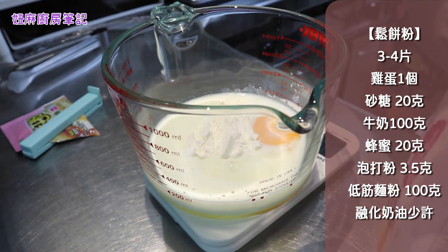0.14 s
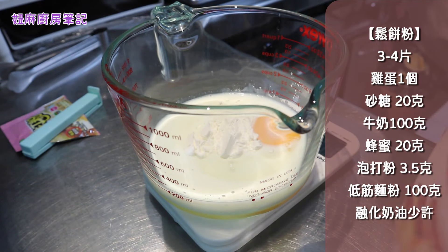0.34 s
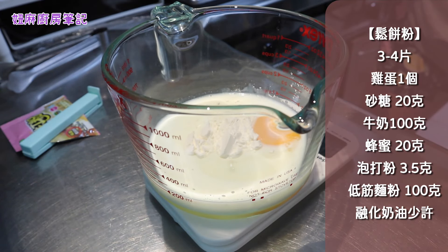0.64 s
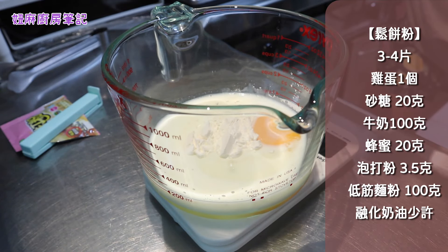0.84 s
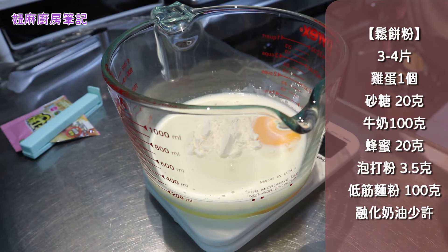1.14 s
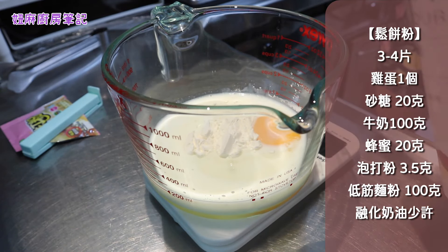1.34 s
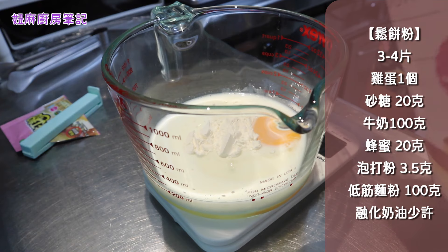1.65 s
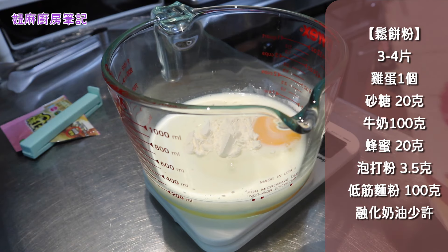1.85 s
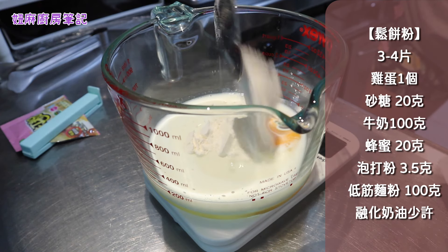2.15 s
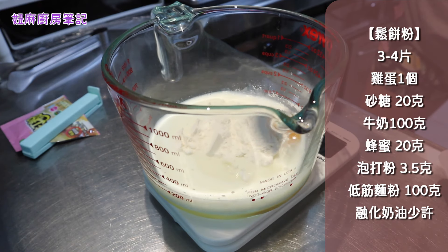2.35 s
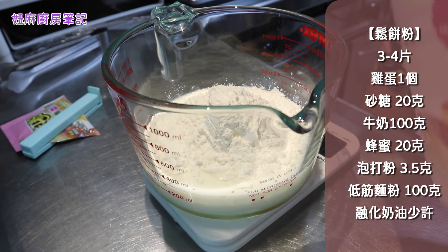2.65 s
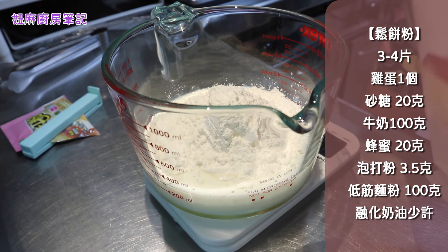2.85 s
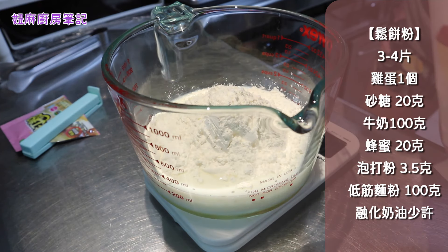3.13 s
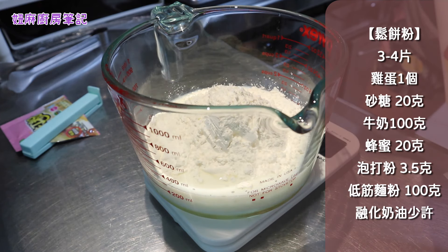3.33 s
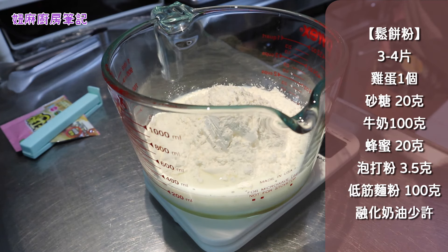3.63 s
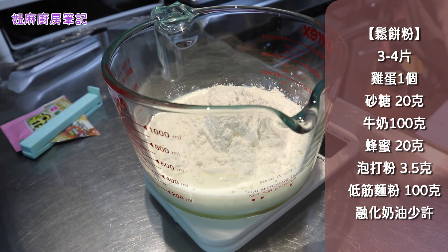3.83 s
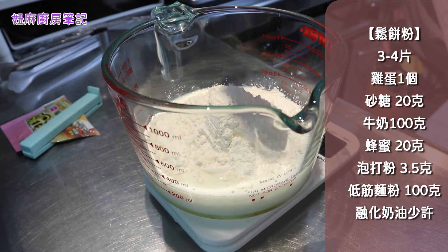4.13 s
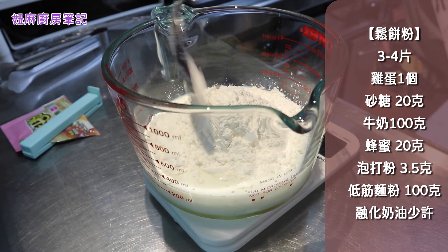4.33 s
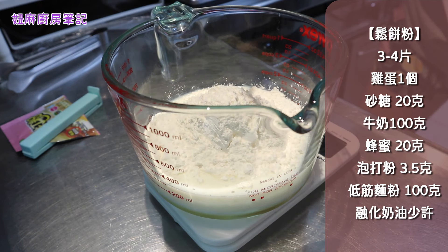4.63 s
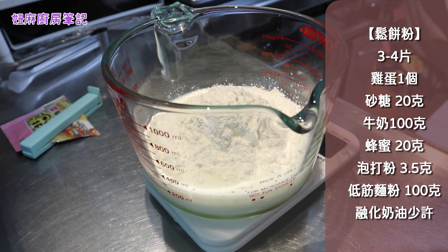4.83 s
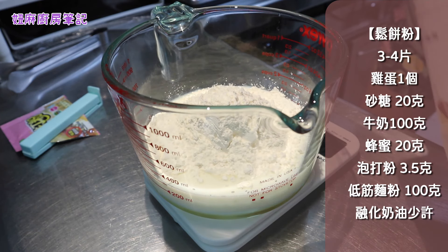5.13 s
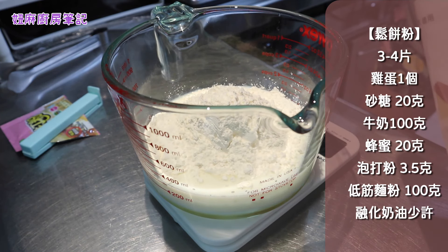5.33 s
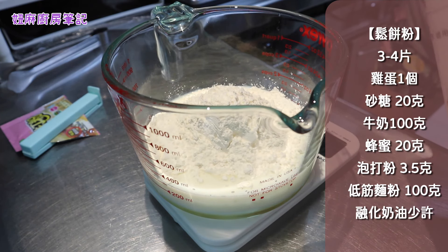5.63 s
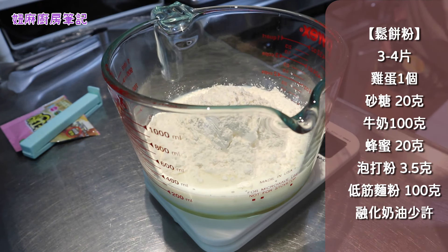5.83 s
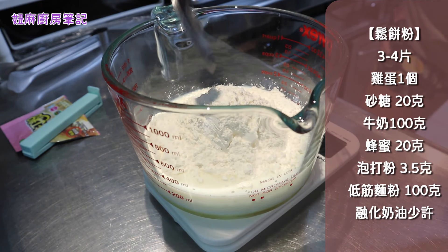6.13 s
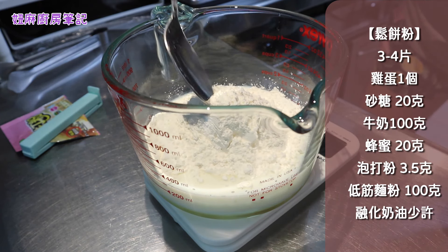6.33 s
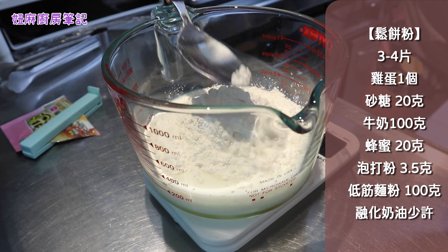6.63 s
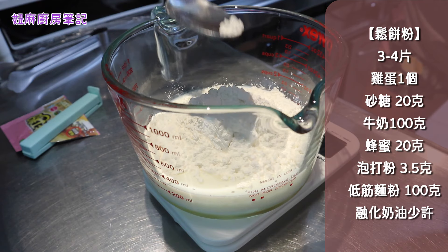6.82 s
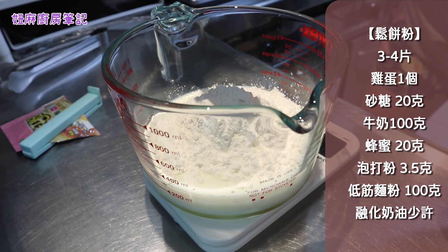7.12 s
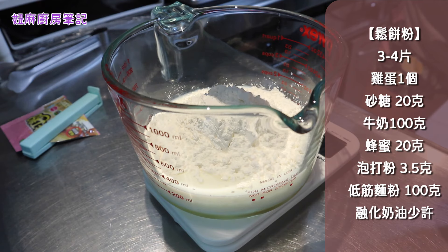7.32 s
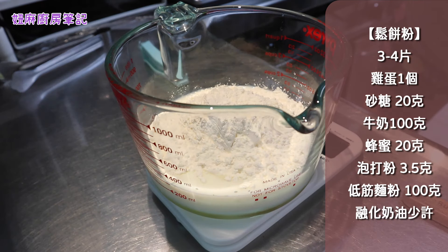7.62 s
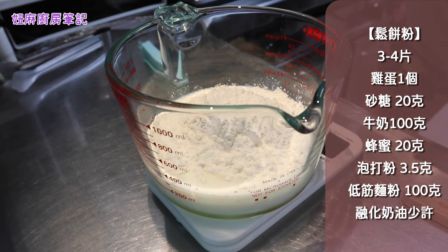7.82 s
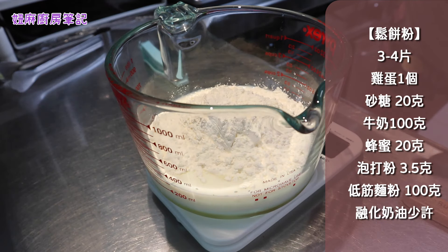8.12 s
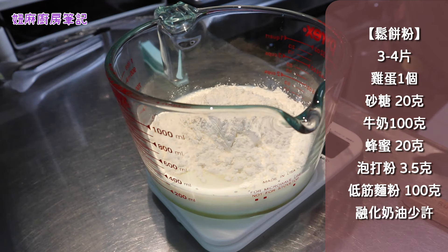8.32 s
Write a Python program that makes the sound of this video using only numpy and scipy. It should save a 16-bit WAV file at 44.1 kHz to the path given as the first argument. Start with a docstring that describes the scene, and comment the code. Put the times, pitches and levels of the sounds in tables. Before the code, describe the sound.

In a small kitchen, a phone on the counter picks up a low, wavering fan and fridge hum with a rush of air. A bag rustles first. After a lull the hum jumps in level, and soft scoop knocks mix with brief hisses of flour sliding into a jug. Scattered taps and another little slide come next, then crisp bursts of bag crinkling finish.

```python
"""A kitchen, heard by a phone on the counter. A fan and a fridge hum in the room's low modes, with a
wavering drone and a rush of air; their level drifts up and jumps once. Flour slides and hisses, a
scoop knocks softly and a bag crinkles, each blow exciting resonances of the object and the counter.
The two microphone ports agree in the bass and oppose each other in the treble."""
import sys
import numpy as np
from scipy import signal
from scipy.fft import rfft, irfft, next_fast_len
from scipy.io import wavfile
from scipy.ndimage import map_coordinates

SR = 44100
rng = np.random.default_rng(int(sys.argv[2]) if len(sys.argv) > 2 else 0)


def bounce(signal):
    """Save signal as a 16-bit WAV file at the path given by the first command-line argument."""
    frames = np.transpose(np.atleast_2d(signal))
    limited = np.clip(frames, -1, 1)
    pcm = np.round(limited * 32767).astype(np.int16)
    wavfile.write(sys.argv[1], SR, pcm)


N = 373527
TOP_HZ = 16258

# All levels are relative. Background before and after its jump. Each row: time in seconds, then
BACKGROUND_LEVELS = [
    [(0.0, -43, -45), (0.12, -43, -36), (0.24, -51, -44.5), (0.28, -39, -39.5), (0.41, -45, -42),
     (0.47, -46, -47.5), (0.6, -50.5, -47.5), (0.88, -47.5, -49), (1.28, -41, -47.5), (1.6, -40.5, -43.5),
     (1.76, -39, -43.5), (2.18, -40, -42), (2.62, -37.5, -43)],
    [(2.63, -33.5, -25), (2.68, -23, -28.5), (2.81, -22, -25), (2.86, -23, -27), (2.97, -24.5, -28),
     (3.05, -20, -28.5), (3.16, -26.5, -26.5), (3.25, -30.5, -36), (3.46, -29.5, -32.5), (3.73, -31.5, -32),
     (4.22, -28.5, -34), (4.89, -29.5, -31.5), (5.05, -24.5, -37), (5.38, -28, -29), (6.26, -27, -31),
     (6.74, -31.5, -31), (7.01, -28.5, -31.5), (7.33, -31, -30.5), (7.44, -28.5, -37), (7.74, -39, -39),
     (8.0, -32, -35), (8.21, -30.5, -33.5), (8.47, -28, -32.5)],
]  # hum and air rush in dB
DRONE_PATH = [
    [(0.0, 64.0, -72), (0.09, 59.9, -46), (0.35, 55.4, -54), (0.48, 43.7, -57), (0.73, 43.3, -57),
     (0.88, 56.0, -44), (1.03, 55.8, -54), (1.15, 44.7, -46), (1.28, 45.4, -51), (1.48, 55.6, -49),
     (1.66, 55.4, -47), (1.81, 43.2, -44), (2.13, 43.8, -39), (2.24, 50.4, -58), (2.36, 45.6, -40),
     (2.5, 46, -47.5), (2.62, 48, -30.5)],
    [(2.63, 59.45, -23), (2.71, 59.6, -27.5), (2.86, 57.2, -27), (2.97, 51.8, -30.5), (3.02, 52, -27.5),
     (3.3, 51.93, -39), (3.38, 50.35, -33.5), (3.62, 50.2, -31.5), (3.73, 56.2, -34), (3.85, 50.4, -33),
     (3.9, 50.4, -32.5), (4.78, 50.33, -26.5), (5.17, 50.6, -28), (5.36, 49.55, -28), (5.44, 52.1, -26.5),
     (5.56, 52.1, -27.5), (5.87, 49.5, -33.5), (5.95, 54.4, -27), (6.01, 55.4, -30.5), (6.21, 52.9, -30.5),
     (6.32, 57.3, -36), (6.37, 57.1, -29.5), (6.89, 56.85, -29), (6.96, 55.4, -27), (7.05, 45.7, -31),
     (7.12, 44.9, -31), (7.2, 45.3, -41), (7.31, 53.2, -29), (7.41, 53.3, -35), (7.53, 44.6, -32),
     (7.59, 44, -46), (8.09, 43.7, -34), (8.47, 43.7, -36.5)],
]  # pitch in Hz, level in dB
# Slides of flour with bag rustle. Each row: time in seconds, hiss in dB, body in dB re hiss.
FLOUR_SLIDES = [
    [(0.0, -78, 7.5), (0.088, -42, 11), (0.13, -67, 8), (0.18, -50.5, 9), (0.308, -79, 6),
     (0.318, -39, 3.5), (0.334, -32, 7.5), (0.368, -54, 8), (0.38, -35, 7.5), (0.398, -54.5, 14.5),
     (0.5, -76, 10)],
    [(1.35, -77, 4), (1.392, -73, 9), (1.4, -67.5, 6), (1.488, -57.5, 5), (1.556, -68, 7), (1.624, -61, 9),
     (1.642, -82, 6), (1.7, -73, 6)],
    [(2.62, -62, 9), (2.624, -46, 11.5), (2.74, -45.5, 2), (2.82, -34, 4), (2.882, -52.5, 7),
     (2.894, -38.5, 4), (2.954, -57, 4), (3.056, -56, 7), (3.066, -35.5, 3), (3.172, -48, 7),
     (3.182, -37, 11.5), (3.192, -44, 8.5), (3.3, -62.5, 9.5)],
    [(3.3, -59, 6), (3.32, -66, 4), (3.334, -41.5, 6), (3.344, -52.5, 6), (3.412, -45, 6),
     (3.422, -58, 8.5), (3.668, -56.5, 6.5), (3.758, -49.5, 5.5), (3.822, -65, 4), (3.876, -39.5, 5),
     (3.926, -53.5, 7), (3.984, -47, 13), (3.996, -43.5, 1), (4.062, -62, 5), (4.1, -70, 6)],
    [(5.6, -67, 3), (5.65, -56, 5), (5.658, -38, 10), (5.7, -60.5, 9), (5.718, -41.5, 6.5), (5.804, -61, 8),
     (5.85, -57, -2)],
    [(6.1, -57.5, 9), (6.18, -56.5, 3), (6.186, -47, 12), (6.214, -67, 10), (6.3, -63, 10)],
    [(7.3, -61, 3), (7.386, -53.5, 17), (7.398, -31.5, 1), (7.428, -47.5, 8), (7.444, -27.5, 3.5),
     (7.494, -47, 6), (7.528, -27, 1), (7.606, -48.5, 8), (7.61, -32, 4.5), (7.644, -55.5, 7),
     (7.776, -49, 17), (7.9, -66, 10)],
    [(8.05, -70, 6), (8.078, -64, 9), (8.086, -33.5, 8), (8.138, -65, 6), (8.172, -41, 8),
     (8.216, -66.5, 6), (8.388, -80, 3), (8.398, -31.5, 5), (8.47, -54, 6)],
]
# Noise spectra. Each row: frequency in Hz, spectral density in dB.
AIR_SPECTRUM = [(15, -34), (25, 1), (53, 2), (145, -15), (170, -6.5), (256, -11.5), (384, -20), (659, -17),
                (1610, -25.5), (2610, -33), (5000, -52.5), (6740, -52.5), (11300, -80.5), (16000, -103)]
HISS_SPECTRUM = [(1470, -19.5), (2500, -0.5), (2940, -7.5), (3310, -17), (4140, -19), (6760, -11),
                 (14500, -45.5), (16000, -33)]
BODY_SPECTRUM = [(180, 2), (300, -5), (429, -18), (468, -18), (516, -4), (1180, -8), (4000, -23),
                 (5200, -24), (8800, -120)]
# Resonances. Each row: centre in Hz, nominal width in Hz, level in dB.
ROOM_MODES = [(86.8, 5, -2.5), (117.46, 6.4, -3.5), (174.84, 6.15, -2.5), (212, 9.1, -6.5), (258.1, 11, -9),
              (516.3, 8, -16)]
MOTOR_WHINE = [(3350, 26, 4.5), (6760, 80, -1.5)]
BAG_MODES = [(1140, 110, -1.5), (1944, 526, 2), (2590, 664, -4)]
SCOOP_MODES = [(1065, 205, 3), (1840, 555, 2.5), (2570, 640, -6.5)]
COUNTER_MODES = [(626, 222, -1.5), (363, 259, -3)]
CRACK_MODES = [(5000, 1840, 7), (9000, 5000, -32)]
# Impacts. Each row: start in seconds, level in dB, thump and crack in dB re that level,
# 60 dB decay time in seconds, ring frequency in Hz.
SCOOP_KNOCKS = [(0.4943, -32, 1.5, -38, 0.039, 1900), (0.6727, -28, -1, -28, 0.037, 1300),
                (0.816, -43, -1, -25, 0.038, 1100), (0.843, -33, -6, -35, 0.038, 1200),
                (2.214, -38, 17, -37, 0.051, 1000), (2.6768, -17.5, 5.5, -23, 0.053, 1720),
                (2.7598, -22, -6, -23, 0.026, 1170), (2.8489, -10.5, 5.5, -35, 0.029, 1710),
                (2.8893, -21, -5, -10, 0.079, 1040), (3.0055, -34, 0, -29, 0.035, 1190),
                (3.0673, -24.5, -12, -5, 0.067, 1780), (3.0894, -8.5, -5.5, -33, 0.046, 1800),
                (3.1796, -9, -1.5, -22, 0.043, 1390), (3.3335, -25, -8, -8, 0.035, 1670),
                (3.404, -23, 7.5, -29, 0.039, 1870), (3.704, -25, -12, -37, 0.038, 1210),
                (3.8868, -22.5, -12, -20, 0.035, 1830), (3.9932, -24, -14, -14.5, 0.045, 1990),
                (5.1372, -19, 9, -24, 0.041, 1880), (5.2593, -11.5, -0.5, -31, 0.037, 1085),
                (5.6596, -13, 2, -26, 0.035, 2100), (5.7143, -20.5, -8, -17, 0.035, 1530),
                (5.8603, -33, -10.5, -24, 0.035, 1140), (6.1885, -26.5, -14, -25, 0.026, 1177)]
BAG_SNAPS = [(0.0348, -21, -0.5, -34, 0.022, 2060), (0.062, -15, -1.5, -22, 0.035, 1380),
             (0.0805, -13.5, -3, -13, 0.025, 1730), (0.0984, -18.5, -5, -24.5, 0.017, 1750),
             (0.1194, -35, 13, -29, 0.019, 1090), (0.1475, -36.5, 15.5, -23, 0.034, 1810),
             (0.1623, -21.5, -22, -21, 0.032, 1320), (0.174, -19, -9, -18, 0.028, 1710),
             (0.212, -18, -5, -31, 0.03, 3070), (0.2731, -16, -16, -20, 0.027, 1930),
             (0.2988, -29, 11, -21, 0.011, 1220), (0.3212, -11, -6, -15, 0.031, 1730),
             (0.3373, -15, 0.5, -1, 0.025, 1120), (0.38, -11, -6, -15, 0.027, 1760),
             (0.4139, -18, -4.5, -36, 0.023, 1870), (7.3682, -21, 5, -11, 0.028, 1500),
             (7.3979, -9, -10, -7, 0.032, 2210), (7.4346, -11.5, -11, -19, 0.033, 2150),
             (7.4452, -5, -16, -8, 0.019, 2010), (7.4699, -18, -14, -0.5, 0.023, 2140),
             (7.5085, -13.5, -5, -8, 0.036, 1670), (7.5252, -6.5, -9.5, -9, 0.028, 2500),
             (7.5531, -9.5, -8, -5, 0.023, 2350), (7.6117, -6.5, -22, -10, 0.023, 2020),
             (7.6829, -19.5, -16, -9, 0.025, 1850), (7.7649, -7.5, -17, -9, 0.021, 1910),
             (7.867, -24.5, -12, -31, 0.031, 1660), (8.087, -12.5, -11, -5, 0.014, 2320),
             (8.1652, -12, -13.5, -21, 0.028, 1640), (8.1734, -14, -11, -13, 0.052, 1980),
             (8.3961, -11, -13, -22, 0.031, 2390), (8.4006, -1.5, -24, -23, 0.026, 1810),
             (8.4066, -13, -26, -7, 0.028, 1780), (8.4465, -16.5, -5, -28, 0.023, 1010)]
# Reverberation. Each row: frequency in Hz, 60 dB decay time in seconds.
KITCHEN_T60 = [(300, 0.15), (2000, 0.21), (10000, 0.17)]
# Port difference re sum. Each row: frequency in Hz, level in dB, phase lead in radians, coherence.
PORT_DIFFERENCE = [(60.0, -23, 2.5, 0.8), (110.0, -15.5, 1.94, 0.85), (220.0, -9, 1.61, 0.76),
                   (390.0, -4.5, 1.42, 0.83), (630.0, -6, 1.54, 0.95), (980.0, -4.5, 1.65, 0.83),
                   (1430.0, -3.5, 1.93, 0.9), (1930.0, -2.5, 2.55, 0.65), (2440.0, -2.5, 3.5, 0.63),
                   (2980.0, 1.5, 3.28, 0.47), (3720.0, 5, 3.8, 0.52), (4810.0, 4, 3.1, 0.4),
                   (6420.0, 4, 3.62, 0.44), (8660.0, 10.5, 4.3, 0.5), (12250.0, 11.5, 3.08, 0.15)]


def amp(db):
    """Amplitude ratio of a level in dB."""
    return 10 ** (np.asarray(db) / 20)


def unit(x):
    """Normalisation to rms 1."""
    return x / np.sqrt(np.mean(x ** 2) + 1e-20)


def along(table, hz, column=1):
    """Interpolation of a column over log frequency."""
    columns = np.transpose(table)
    return np.interp(np.log(hz + 1), np.log(columns[0] + 1), columns[column])


def curves(rows):
    """Interpolation of each column over time, sample by sample."""
    times, *columns = np.transpose(rows)
    return [np.interp(np.arange(N) / SR, times, c) for c in columns]


def wobble(rate):
    """Smooth random modulation, rate knots a second."""
    return map_coordinates(rng.standard_normal(int(N * rate / SR) + 4), [np.arange(N) * rate / SR])


def filtered(x, response):
    """Linear filtering: the spectrum times a frequency response."""
    size = next_fast_len(x.shape[-1] + min(x.shape[-1] // 8, 8192))
    return irfft(rfft(x, size) * response(np.fft.rfftfreq(size, 1 / SR)), size)[..., :x.shape[-1]]


def modes(table):
    """Superposition of damped resonators, alternating in sign."""
    return lambda f: sum((-1) ** k * amp(db) * 1j * f * width / (hz * hz - f * f + 1j * f * width)
                         for k, (hz, width, db) in enumerate(table))


def noise(response):
    """Two incoherent noises of one spectrum: the direct path and the scattered one."""
    return unit(filtered(rng.standard_normal((2, N)), response))


def resonant_noise(table):
    """Random excitation of resonances gives narrow bands of noise."""
    return noise(lambda f: sum(amp(db) / np.sqrt(width) * np.abs(modes([(hz, width, 0)])(f)) ** 1.435
                               for hz, width, db in table))


def drone():
    """A deep tone wavers by frequency and amplitude modulation, over a rumble."""
    hz, db = curves(sum(DRONE_PATH, []))
    phase = 2 * np.pi * np.cumsum(hz + 3 * wobble(9)) / SR
    tone = np.sqrt(2) * np.sin(phase) * amp(2.5 * wobble(7.2))
    rumble = resonant_noise([(49.6, 25, 6), (28, 20, -10.5)])
    return amp(db - 0.5) * (tone + .7 * rumble)


def fan_and_fridge():
    """Forced room modes hum under a broadband rush of air and a motor whine."""
    hum_db, air_db = curves(sum(BACKGROUND_LEVELS, []))
    hum = amp(hum_db - 1) * resonant_noise(ROOM_MODES)
    air = noise(lambda f: amp(along(AIR_SPECTRUM, f)) * f ** 2 / (f ** 2 + 200 ** 2))
    whine = amp(-34.5) * resonant_noise(MOTOR_WHINE)
    return hum + amp(air_db + 1 + 0.68 * wobble(7)) * (air + whine)


def sliding_flour():
    """Granular flow: uneven grains, in clumps, sum to a hiss and a duller body."""
    out, t = np.zeros((2, N)), np.arange(N) / SR
    grains = rng.standard_normal((2, N)) * amp(1.66 * wobble(40) + 3.2 * wobble(400))
    hiss = unit(filtered(grains, lambda f: amp(along(HISS_SPECTRUM, f))))
    body = unit(filtered(grains, lambda f: amp(along(BODY_SPECTRUM, f))))
    for rows in FLOUR_SLIDES:
        hiss_db, body_db = curves(rows)
        gate = np.clip(np.minimum(t - rows[0][0], rows[-1][0] - t) / .005, 0, 1)
        out += gate * amp(hiss_db + 1) * (hiss + amp(body_db) * body)
    return out


def impacts(events, object_modes, gain_db):
    """Impact excitation: dying noise bursts drive the object, the counter and a treble crack."""
    out, t = np.zeros((2, N + SR)), np.arange(SR // 10) / SR
    attack = (1 - np.exp(-t / .00037)) * (1 + 1.1 * np.exp(-t / .0007))
    for start, db, thump_db, crack_db, t60, ring_hz in events:
        at = round(start * SR)
        struck_modes = object_modes + [(ring_hz, 700, 3)]  # each spot favours its own pitch
        parts = [(struck_modes, 0, t60), (COUNTER_MODES, thump_db, 1.3 * t60),
                 (CRACK_MODES, crack_db, .8 * t60)]
        for resonances, part_db, part_t60 in parts:
            decay = amp(-60 * t / part_t60)
            burst = rng.standard_normal((2, len(t))) * attack * decay
            ring = filtered(burst, lambda f: modes(resonances)(f) / (1 + 1j * f / 9000) ** 2)
            ring *= np.linalg.norm(decay) / np.linalg.norm(ring[0])  # same energy as the envelope
            out[:, at:at + len(t)] += amp(db + part_db + gain_db) * ring
    return out[:, :N]


def reverberation(x, level_db):
    """Diffuse decay, each frequency at its own rate; a new tail every quarter second."""
    out, step, delay = np.zeros((2, N + 2 * SR)), SR // 4, 300
    for start in range(0, N, step):
        hz, t, spectra = signal.stft(rng.standard_normal((2, SR // 2)), SR, nperseg=256)
        decay = amp(-60 * t / along(KITCHEN_T60, hz)[:, None])
        tail = signal.istft(spectra * decay, SR, nperseg=256)[1]
        wet = signal.fftconvolve(x[:, start:start + step], tail / np.linalg.norm(tail[0]), axes=1)
        out[:, start + delay:start + delay + wet.shape[1]] += wet
    return amp(level_db) * out[:, :N]


def microphone_ports(paths):
    """Partial coherence: the sum is direct sound; the difference is part phase-shifted, part scattered."""
    direct, scattered = paths
    gain = lambda f: amp(along(PORT_DIFFERENCE, f))
    lead = lambda f: along(PORT_DIFFERENCE, f, column=2)
    coherence = lambda f: along(PORT_DIFFERENCE, f, column=3)
    side = filtered(direct, lambda f: gain(f) * coherence(f) * np.exp(1j * lead(f)))
    side += filtered(scattered, lambda f: gain(f) * np.sqrt(1 - coherence(f) ** 2))
    return np.array([direct + side, direct - side])


def scene():
    """Superposition of all sources at the ports; only the impacts reverberate."""
    background = drone() + fan_and_fridge()
    knocks = impacts(SCOOP_KNOCKS, SCOOP_MODES, gain_db=-2)
    crinkles = impacts(BAG_SNAPS, BAG_MODES, gain_db=-4.5)
    room = reverberation(knocks + crinkles, level_db=-12.5)
    return microphone_ports(background + sliding_flour() + knocks + crinkles + room)


def record(dry):
    """Band limiting: the phone keeps nothing above TOP_HZ and clips at full scale."""
    return np.clip(filtered(dry, lambda hz: hz < TOP_HZ), -1, 1)


dry = scene()
out = record(dry)
bounce(out)
```